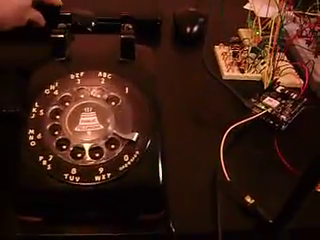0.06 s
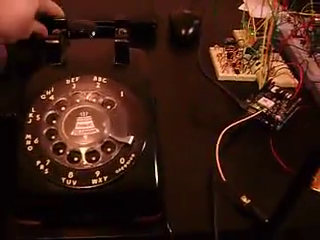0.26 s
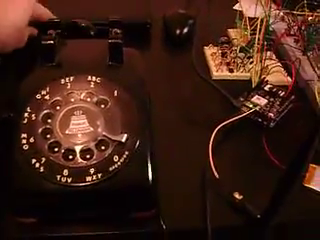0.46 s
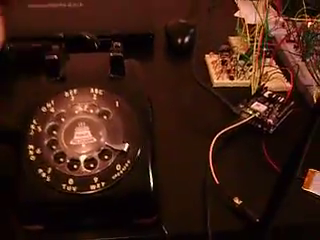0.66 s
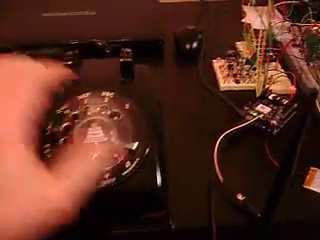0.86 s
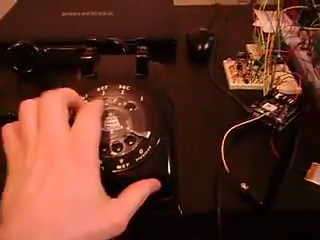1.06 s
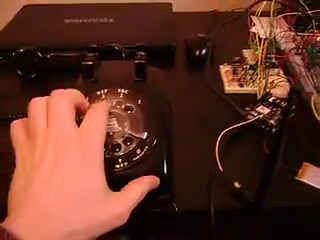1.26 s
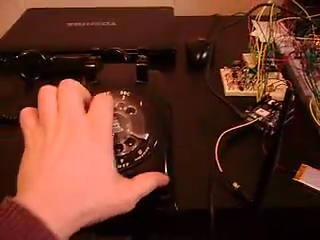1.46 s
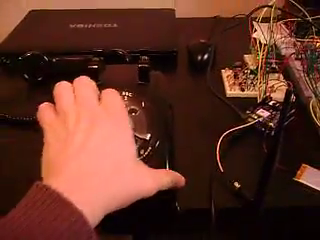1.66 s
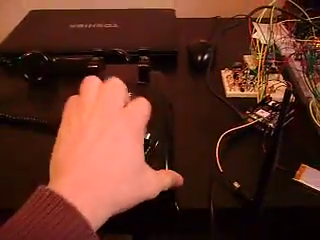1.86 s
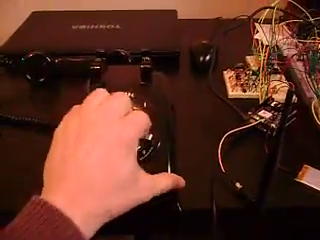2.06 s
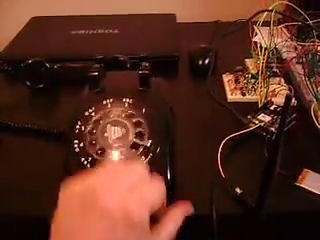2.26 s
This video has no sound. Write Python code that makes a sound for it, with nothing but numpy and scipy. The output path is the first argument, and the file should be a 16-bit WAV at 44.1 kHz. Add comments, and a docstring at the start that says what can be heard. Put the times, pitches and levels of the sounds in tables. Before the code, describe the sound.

Telephone handset knocks and clunks down hard on a wooden desk, then its dial rattles faintly

```python
"""In a small room with soft hum and hiss, a desk telephone is handled on a wooden desk.
The handset is lifted, knocking on its cradle, and put down hard, overloading a narrow-band microphone.
A finger then touches the dial, winds it to the stop and lets go; the dial whirrs back.
Knocks are clicks into decaying modes plus bursts of bright noise; the slide is rubbing noise.
The dial's gears are random tooth clicks and hiss; the room is a decaying noise tail."""
import sys
import numpy as np
from scipy import signal
from scipy.fft import rfft, irfft
from scipy.io import wavfile

SR = 44100
rng = np.random.default_rng(int(sys.argv[2]) if len(sys.argv) > 2 else 0)


def to_linear_factor(level_db):
    """Convert decibel levels (scalar or array-like) to linear amplitude factors."""
    exponent = np.asarray(level_db, float) / 20
    return 10 ** exponent


def transcribe(signal):
    """Save signal, clipped to [-1, 1], as a 16-bit WAV file at the path in sys.argv[1]."""
    frames = np.atleast_2d(signal).T
    limited = np.clip(frames, -1, 1)
    pcm = np.round(limited * 32767).astype(np.int16)
    wavfile.write(sys.argv[1], SR, pcm)


N = 101430  # length in samples, 2.3 s

# Handset knocking on cradle and desk. Each row: time in seconds, then the relative strength
# of the desk ring, the shell ring and the crack, all in dB.
HANDSET_KNOCKS = [(0.2052, -8, -7, -13), (0.2116, -3, -38, -49), (.217, -10.5, -22.5, -29),
                  (0.2439, -9, -6.5, -28), (0.2471, -4, -5.5, -12.5), (0.259, -18, -23, -43.5),
                  (0.2724, -10, -4.5, -13), (.284, -1.5, -38.5, -33), (.296, -14.5, -12, -29),
                  (.309, -9.5, -17, -23.5), (0.321, -11, -31.5, -42.5), (0.334, -12.5, -35, -31),
                  (0.369, -22, -30, -34.5), (0.4957, 10, -0.5, -1.5), (.508, -2, -17.5, -16),
                  (.518, 1, -18, -21.5), (.529, -2, -4.5, -21), (.537, -0.5, -17.5, -30),
                  (.552, -10.5, -17.5, -23), (0.563, -10, -30, -32), (.572, -14, -28.5, -34),
                  (0.623, -23, -28.5, -38)]
# Handset sliding onto the desk before it drops. Each row: time in seconds, rubbing level in dB.
HANDSET_SLIDE = [(.425, -60), (.445, -33.5), (.466, -19.5), (.478, -15.5), (.49, -23.5), (.5, -67.5)]
# Ringing modes of the desk under the telephone.
# Each row: frequency in Hz, relative level in dB, 60 dB decay time in seconds.
DESK_MODES = [(140, -24, 0.15), (238, -17.5, 0.04), (311.3, -17.5, 0.15), (368.8, -3, 0.15),
              (400, -6, 0.022), (418, -0.5, 0.12), (471.4, -9.5, 0.24), (484, -3.5, 0.097),
              (508, -10, 0.11), (567, -10, 0.095), (617.4, -17, 0.13), (662, -12.5, 0.073)]
# Ringing modes of the hard plastic shell.
# Each row: frequency in Hz, relative level in dB, 60 dB decay time in seconds.
SHELL_MODES = [(786, -7, 0.053), (902, 0, 0.079), (976, 0.5, 0.041), (1025, 1, 0.017), (1000, -10, 0.014),
               (1144, -2, 0.065), (1122.4, -5, 0.08), (1230, -33.5, 0.013), (1730, -16, 0.065),
               (2134, -13, 0.019)]


def handset():
    """Knocks ring desk and shell and crack brightly; the slide rubs their modes and adds a hiss."""
    s, desk_db, shell_db, crack_db = np.transpose(HANDSET_KNOCKS)
    slide = level(HANDSET_SLIDE)
    rub = slide * rng.standard_normal(N) / np.sqrt(SR / 200)
    desk = struck(DESK_MODES, s, desk_db, rub)
    shell = struck(SHELL_MODES, s, shell_db, 0.56 * rub)
    slide_hiss = slide * to_linear_factor(-14) * coloured(CRACK_COLOUR)
    return desk + shell + cracks(s, crack_db) + slide_hiss


# Finger plate tapped, stopped and let go.
# Each row: time in seconds, relative strength of the ring in dB and of the crack in dB.
PLATE_TAPS = [(1.0853, -35.5, -37.5), (1.091, -34, -37), (1.097, -34.5, -35), (1.108, -36.5, -59),
              (1.7902, -40.5, -49), (1.8226, -41, -49), (1.9636, -28.5, -28), (1.974, -36, -55),
              (2.0095, -36, -31.5), (2.188, -38, -61), (2.201, -36, -24.5), (2.2045, -27.5, -40.5),
              (2.2071, -18.5, -33), (2.219, -27.5, -48)]
# Ringing modes of the dial and its gears.
# Each row: frequency in Hz, relative level in dB, 60 dB decay time in seconds.
DIAL_MODES = [(440, -9, .04), (704, -6, 0.15), (780, -20, 0.034), (977, 5.5, 0.052), (1058, 2.5, 0.044),
              (1144, -4, .025), (1390, -2, 0.0084), (2090, -3.5, 0.017), (2560, -3.5, .015),
              (2820, -29.5, 0.028), (4060, -43, .012), (5080, -5.5, 0.026)]
# Gear rattle while the dial turns, one list per turn. Each row: time in seconds, level in dB.
DIAL_TURNS = [
    [(1.66, -50), (1.682, -36), (1.7, -53), (1.77, -46), (1.79, -41), (1.81, -34.5), (1.824, -32),
     (1.852, -22), (1.862, -32), (1.87, -29), (1.882, -20.5), (1.893, -40), (1.924, -28), (1.95, -37),
     (1.985, -34), (2.0, -33), (2.025, -38), (2.06, -58)],
    [(2.16, -51), (2.19, -31), (2.23, -32.5), (2.27, -30), (2.285, -28), (2.3, -57.5)],
]
TEETH_PER_S, TOOTH_SPREAD_DB = 510, 4  # average rate, scale of the random strength
GEAR_HISS_DB = -13.5                   # relative to the rattle level
DIAL_BASS_CUT_HZ = 590


def dial():
    """Plate taps and uneven gear teeth ring the dial's modes, with a bright hiss while it turns."""
    s, ring_db, crack_db = np.transpose(PLATE_TAPS)
    turning = sum(level(rows) for rows in DIAL_TURNS)
    tooth_hits = rng.random(N) < TEETH_PER_S / SR
    strength = np.minimum(rng.exponential(1, N), 3) - 1
    direction = rng.choice([-1, 1], N)
    gears = turning * 0.17 * tooth_hits * to_linear_factor(TOOTH_SPREAD_DB * strength) * direction
    body = high_pass(struck(DIAL_MODES, s, ring_db, gears), DIAL_BASS_CUT_HZ)
    gear_hiss = turning * to_linear_factor(GEAR_HISS_DB) * coloured(CRACK_COLOUR)
    return body + cracks(s, crack_db) + gear_hiss


# Colour of the contact noise. Each row: frequency in Hz, relative level in dB per Hz.
CRACK_COLOUR = [(760, 3), (1300, -15), (1670, -15), (2120, -8), (4900, -8.5), (5600, -15.5), (7280, -40.5),
                (12300, -120)]
CRACK_T60_S = 0.029
RATTLE_PER_S, RATTLE_DB = 200, -3.5          # average tick rate, tick ceiling relative to the blow
RATTLE_T60_S, TICK_T60_S = 0.18, 0.0075      # decay of the whole chatter, and of one tick


def cracks(s, db):
    """Each contact is a fast-dying burst of bright noise, then uneven ticks of loose parts."""
    blows = train(s, db)
    tick_hits = rng.random(N) < RATTLE_PER_S / SR
    tick_heights = rng.uniform(0.23, 1, N) * to_linear_factor(RATTLE_DB)
    ticks = tick_hits * tick_heights * decay(blows, RATTLE_T60_S)
    envelope = decay(blows, CRACK_T60_S) + decay(ticks, TICK_T60_S)
    return envelope * coloured(CRACK_COLOUR)


MODE_SPREAD_DB = 3.5  # standard deviation


def struck(modes, s, db, rubbing=0):
    """Every blow strikes every mode with a strength of its own; rubbing feeds the modes steadily."""
    spread = MODE_SPREAD_DB * rng.standard_normal((len(s), len(modes)))
    total = np.zeros(N)
    for k, (hz, mode_db, t60) in enumerate(modes):
        drive = train(s, db + spread[:, k]) + rubbing
        total += to_linear_factor(mode_db - 6) * ring(drive, hz, t60)
    return total


ROOM_T60_S, ROOM_ONSET_S, WALL_CUT_HZ = 0.31, 0.012, 20200


def room(x):
    """Dense reflections: noise that builds up over a few milliseconds and dies away."""
    t = np.arange(SR // 2) / SR
    build_up = 1 - np.exp(-(t / ROOM_ONSET_S) ** 2)
    tail = rng.standard_normal(len(t)) * to_linear_factor(-60 * t / ROOM_T60_S) * build_up
    tail = signal.sosfilt(signal.butter(1, WALL_CUT_HZ, fs=SR, output="sos"), tail)
    tail = tail / np.sqrt(np.sum(tail ** 2))  # unit energy
    return signal.fftconvolve(x, tail)[:N]


# Colour of the room noise. Each row: frequency in Hz, relative level in dB per Hz.
AIR_COLOUR = [(20, -4), (60, -4), (85, -12), (120, 2.5), (240, -2), (450, 4.5), (800, -0.5), (1150, -3.5),
              (1500, -10.5), (3000, -13), (5500, -17.5)]
AIR_DB = -47.5  # rms
# Mains hum. Each row: frequency in Hz, rms level in dB.
HUM_TONES = [(236.9, -59.5), (296.1, -61)]


def background():
    """Steady coloured noise for the room, and mains hum as sines of random phase."""
    t = np.arange(N) / SR
    mix = to_linear_factor(AIR_DB) * coloured(AIR_COLOUR)
    for hz, db in HUM_TONES:
        mix += np.sqrt(2) * to_linear_factor(db) * np.sin(2 * np.pi * (hz * t + rng.random()))
    return mix


def rms_one(x):
    """Scale to an rms of 1."""
    return x / np.sqrt(np.mean(x ** 2) + 1e-20)


def level(rows):
    """Gain over time from (s, dB) rows, practically silent outside them."""
    s, db = np.transpose(rows)
    return to_linear_factor(np.interp(np.arange(N) / SR, s, db, left=-150, right=-150))


def train(s, db):
    """Single-sample clicks at the given seconds and levels."""
    clicks = np.zeros(N)
    np.add.at(clicks, (np.asarray(s) * SR).astype(int), to_linear_factor(db))
    return clicks


def decay(x, t60):
    """Every click in x becomes an exponential decay, 60 dB down after t60 seconds."""
    return signal.lfilter([1], [1, -to_linear_factor(-60 / (t60 * SR))], x)


def ring(clicks, hz, t60):
    """Two-pole resonator: a unit click starts a decaying sine of initial height 1."""
    r = to_linear_factor(-60 / (max(t60, .005) * SR))
    w = 2 * np.pi * hz / SR
    return signal.lfilter([0, np.sin(w)], [1, -2 * r * np.cos(w), r * r], clicks + 1e-18)


def coloured(spectrum):
    """Steady noise of the given colour, rms 1, shaped along a log frequency axis."""
    hz, db = np.transpose(spectrum)
    bins_hz = np.maximum(np.fft.rfftfreq(N, 1 / SR), 1)
    gain = to_linear_factor(np.interp(np.log(bins_hz), np.log(hz), db))
    return rms_one(irfft(rfft(rng.standard_normal(N)) * gain, N))


def high_pass(x, hz):
    """Second-order bass cut."""
    return signal.sosfilt(signal.butter(2, hz, "high", fs=SR, output="sos"), x)


def scene():
    """Telephone (thinned by the microphone's bass roll-off), its room and the background."""
    phone = high_pass(handset() + dial(), 230)
    reflections = to_linear_factor(-11.5) * room(phone)
    return (phone + reflections + background())[None]


def roll_off(x):
    """The treble ends steeply here."""
    return signal.sosfilt(signal.butter(12, 16970, fs=SR, output="sos"), x)


MIC_TOP_HZ = 5500
INPUT_TOP, CONVERTER_TOP = 0.735, 0.71  # clipping heights, full scale = 1


def record(dry):
    """Narrow-band recorder: input overload, steep top cut, then hard clipping in the converter."""
    overloaded = np.clip(dry, -INPUT_TOP, INPUT_TOP)
    narrow = signal.sosfilt(signal.cheby1(10, .5, MIC_TOP_HZ, fs=SR, output="sos"), overloaded)
    return roll_off(np.clip(narrow, -CONVERTER_TOP, CONVERTER_TOP))


dry = scene()
out = record(dry)
transcribe(out)
```